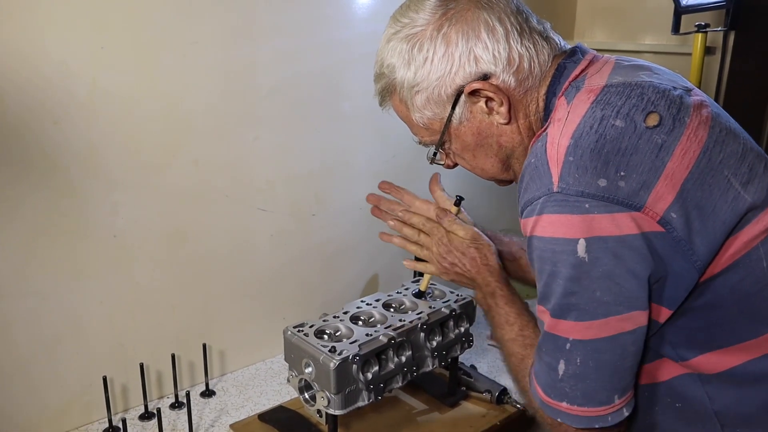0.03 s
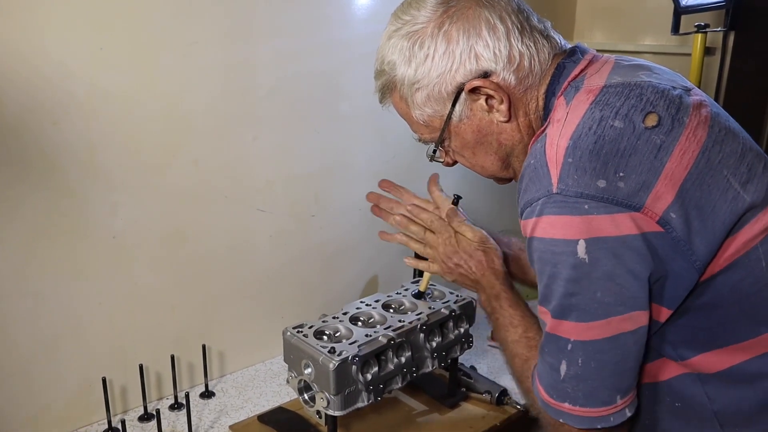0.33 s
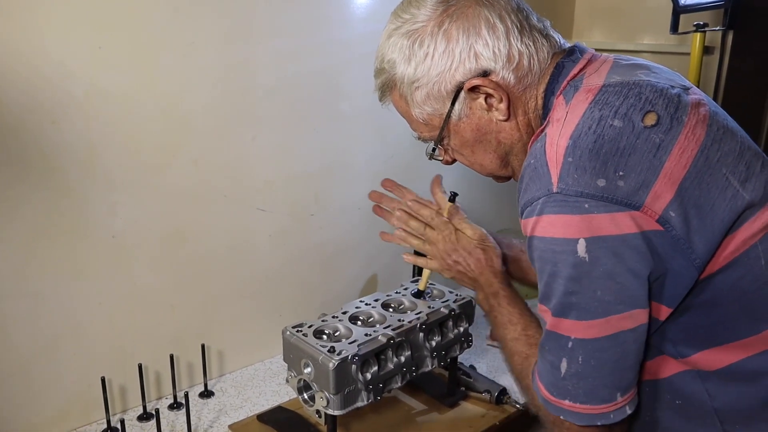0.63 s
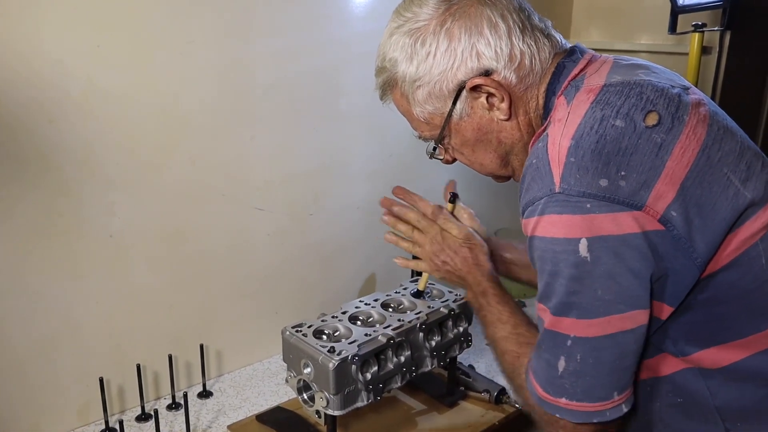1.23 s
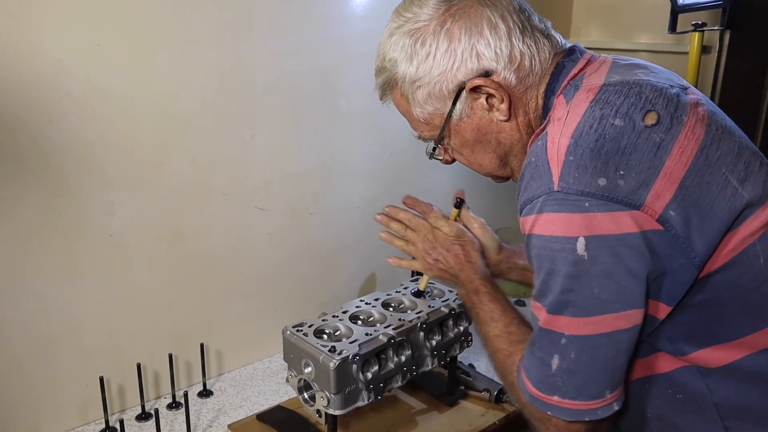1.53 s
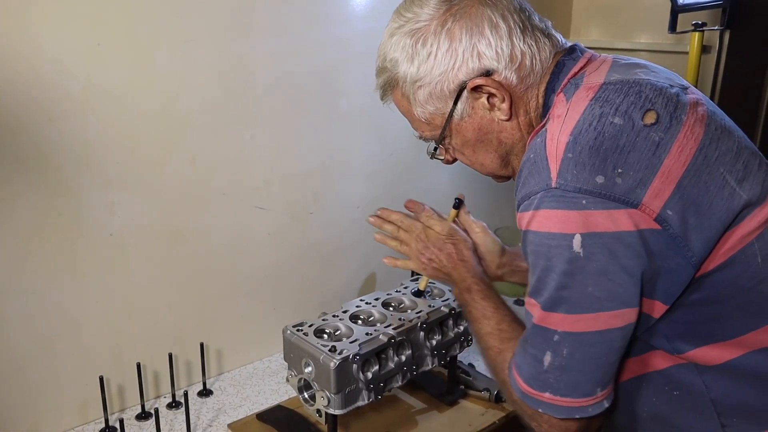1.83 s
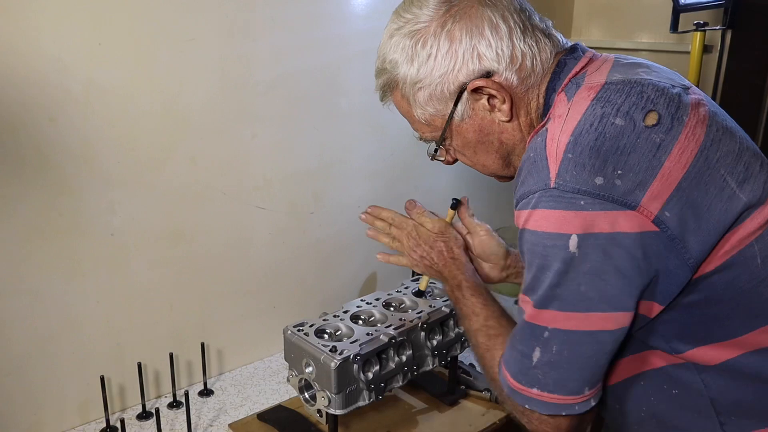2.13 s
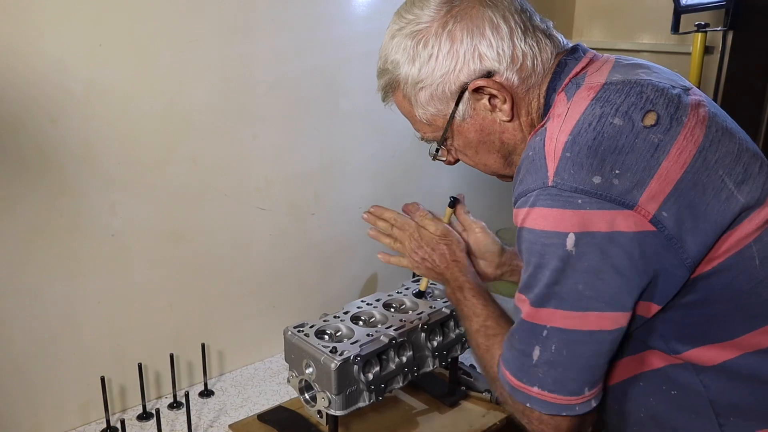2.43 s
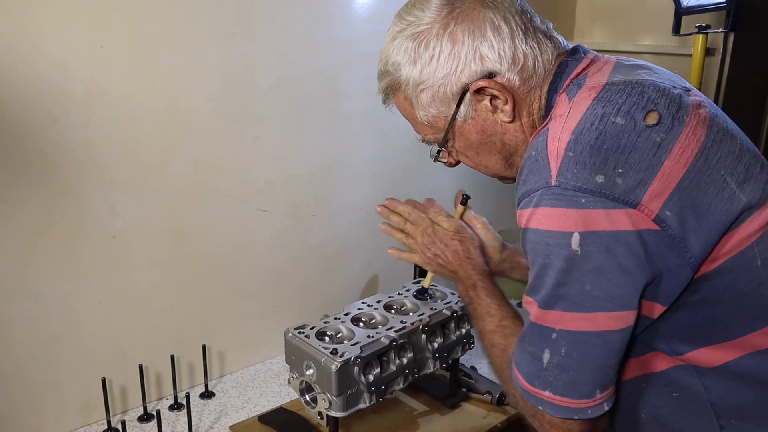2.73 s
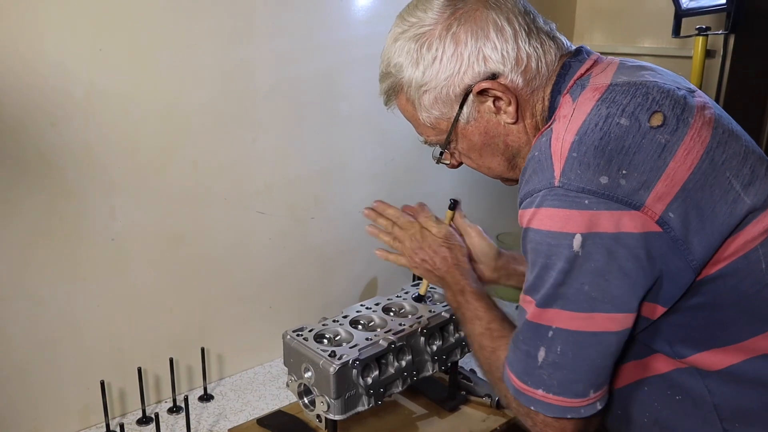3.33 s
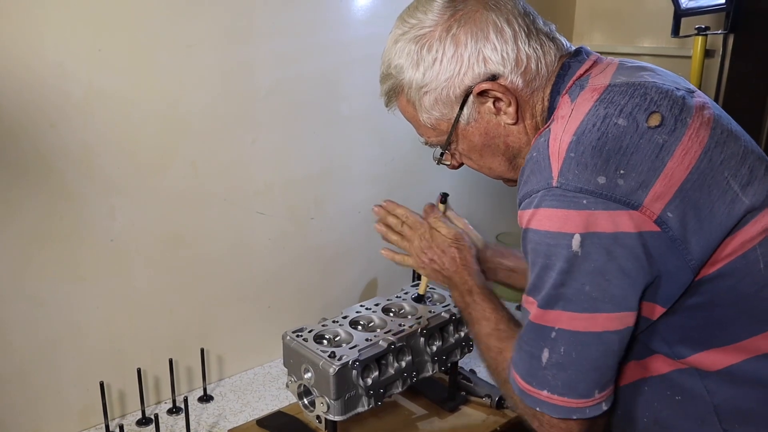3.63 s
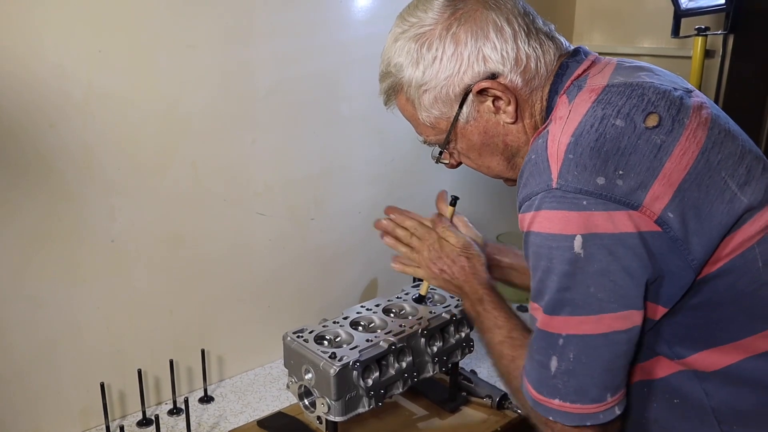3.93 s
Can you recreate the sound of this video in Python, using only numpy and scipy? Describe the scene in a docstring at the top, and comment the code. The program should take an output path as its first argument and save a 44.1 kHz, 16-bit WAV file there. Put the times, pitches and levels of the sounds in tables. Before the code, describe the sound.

Close up in a small workshop, gritty metallic grinding pulses rapidly as a valve is twisted back and forth in a cylinder head. It pauses briefly, the valve knocks back down, and the ringing scrape continues over a faint rumble.

```python
"""A valve rings as it is lapped in a cylinder head, twisted to and fro about seven times a second by a
stick rolled between the palms. Grains of abrasive paste break on the seat: their impacts make a broad
crunch and excite the modes of valve and casting, and stick-slip friction makes single modes squeal.
The valve is lifted and rings on freely, then lands with a knock that shakes the bench, and the lapping
resumes. A small workshop reflects crunch and knock, and rumbles and hums faintly."""
import sys
import numpy as np
from scipy import signal
from scipy.fft import rfft, irfft
from scipy.io import wavfile
from scipy.ndimage import uniform_filter1d

SR = 44100
rng = np.random.default_rng(int(sys.argv[2]) if len(sys.argv) > 2 else 0)


def master(y):
    """Save y as 16-bit WAV."""
    cut = np.clip(np.atleast_2d(y).T, -1, 1)
    pcm = np.round(cut * 32767)  # scale
    wavfile.write(sys.argv[1], SR, pcm.astype(np.int16))


N = 176400
T = np.arange(N) / SR

# Modes of valve and casting. Each row: frequency in Hz, level in dB before the drive is added,
# left-minus-right level in dB, phase lead of the left channel in radians.
METAL_MODES = [(1179, -41.3, -2, 0.8), (1229, -37.7, 6, 0.2), (1294, -36.8, 4, 0.1), (1593, -38, 1, -0.5),
               (1782, -39.1, -5, -2.6), (2671, -33.6, -3, 0.3), (2785, -42.6, 3, 2.8), (2890, -42, 0, 2),
               (3339, -35.3, 1, 2.4), (3506, -33.3, -5, 0.1), (3591, -33.0, 3, -0.1), (3750, -41, 0, 2),
               (3840, -41, 0, 2), (4067, -33.2, 2, 2.9), (4151, -36.2, -5, 1.6), (4205, -36.8, 2, 3.0),
               (4453, -38.4, 0, 1.9), (5152, -31, -2, 0.9), (5319, -30.5, 5, 2.5), (5824, -41.5, 4, -2.5),
               (5954, -42, 2, 3.1), (6154, -35.6, 0, 2.5), (6306, -39.2, 3, -2.6), (6579, -34.6, 3, 1.1),
               (6737, -34.4, 2, -2.8), (6813, -36.8, -2, -2.4), (6881, -37.8, 7, 2.8),
               (7048, -35.2, 4, 2.1), (7471, -35.2, -1, 1.3), (7721, -36.6, -6, -1.4),
               (8020, -32.8, 0, 2.6), (8287, -28.4, 1, 2.0), (8515, -36.3, -6, 3.0), (8574, -34.2, 0, 1.6),
               (8801, -38.2, -1, 2.9), (8919, -33.8, -1, 2.4), (8992, -36.2, 0, 1.8), (10348, -39, 1, 2.6),
               (10939, -35.7, -2, 2.7), (11514, -33.5, 2, -2.5), (11888, -32.8, 0, -3.1),
               (12394, -41, 1, 3.1)]
# How hard the grains drive the modes. Each row: frequency in Hz, gain in dB.
MODE_DRIVE = [(1250, 0), (12000, 0.6)]
# Modal decay; the valve's own pair near 3.5 kHz lasts longest.
# Each row: frequency in Hz, 60 dB decay time in seconds before DECAY_STRETCH.
MODE_DECAY = [(1250, .14), (3340, .27), (3500, .7), (3600, .76), (3750, .18), (5150, .26), (6900, .27),
              (8300, .19), (10300, .1)]
# Twists of the stick. Each row: start in seconds, peak moment as a share of the twist before PEAK_LEAD,
# relative levels of rasp, ring and hiss in dB.
TWISTS = [(-0.04, 0.36, 2.5, 0.8, -3), (0.108, 0.35, 1.0, 0.5, 0.1), (0.251, 0.55, 3, -1, 0.3),
          (0.395, 0.45, -0.2, -1, 0.8), (0.533, 0.57, 0, -1, 0), (0.68, 0.5, 1.2, 0.2, 0.3),
          (0.825, 0.44, -2, -0.7, -0.7), (0.968, 0.45, -0.3, -0.4, 1.2), (1.113, 0.47, -0.6, -3, 0.3),
          (1.246, 0.45, -2, -2, 2.5), (1.391, 0.44, 2, -0.4, 1.2), (1.521, 0.45, -2.5, -0.5, 0.9),
          (1.663, 0.48, -6, -1.5, -1.1), (1.8, 0.31, 3.1, 1, 0.8), (1.958, 0.39, -3.5, 0.5, -2),
          (2.09, 0.3, -3.5, -2, 0), (2.235, 0.22, 0.7, -0.3, 0), (2.365, 0.35, -2.5, -2.5, -0.8),
          (2.491, 0.65, 3.5, 0.5, 0.2), (2.622, 0.4, 3.5, 1, 1.2), (2.924, 0.34, 5, 1.9, -1),
          (3.075, 0.42, 2, -0.5, -2.2), (3.22, 0.45, 1.5, -1, -1.8), (3.376, 0.5, -1.2, -0.5, -4),
          (3.506, 0.3, 1.9, 0.5, 0.7), (3.653, 0.45, -1, -1.3, -2.5), (3.8, 0.3, -1.6, -0.4, 2.2),
          (3.933, 0.35, -2.5, -1, 0)]
# Rasp, ring and hiss. Each row: centre in Hz, share of the strength left as the stick reverses.
GRINDING_REGISTERS = [(1500, 0.91), (4000, 0.45), (8000, 0.02)]
# Grips of the seat. Each row: peak time in seconds, frequency in Hz near the mode, rms level in dB.
GRIPS = [(.32, 2670, -30), (.96, 2670, -28), (1.495, 2670, -25), (3.195, 2670, -28), (3.52, 2670, -29),
         (.31, 3506, -30), (1.48, 3506, -31), (1.97, 3590, -30), (3.6, 3590, -30), (3.7, 3506, -30),
         (.75, 5150, -26.5), (1.08, 5150, -27), (1.885, 5150, -23), (2.57, 5150, -23), (2.7, 5150, -23),
         (3.295, 5150, -24), (3.575, 5150, -24), (1.35, 5320, -25), (3.45, 5320, -27), (.76, 8285, -22),
         (1.61, 8285, -22)]
# Spectrum of the paste. Each row: frequency in Hz, relative spectral density in dB.
CRUNCH_SPECTRUM = [(300, -82), (750, -79.5), (1000, -71), (1200, -60), (1450, -70), (1800, -61),
                   (2200, -67.5), (2750, -64.5), (3150, -68.5), (3800, -58.5), (4750, -99), (5700, -66.5),
                   (6700, -61.5), (9300, -63), (10800, -57.5), (11800, -57), (13000, -82), (14300, -101)]
# Blows of the settling valve. Each row: delay in seconds, relative level in dB.
LANDING_BLOWS = [(.001, -1), (.007, -2), (.022, -7)]
# Modes of the bench. Each row: frequency in Hz, response to a unit blow in dB, 60 dB decay in seconds.
BENCH_MODES = [(85, -26, 1), (132.3, -32.5, 0.58), (196, -41, 0.72), (294.7, -38.5, 0.36)]
# Spectrum of the landing clatter. Each row: frequency in Hz, relative spectral density in dB.
CLATTER_SPECTRUM = [(45, 6), (150, 6), (300, -6), (750, -12.5), (1200, 10.5), (13000, -19)]
# Rumble of the room. Each row: frequency in Hz, spectral density in dB.
RUMBLE_SPECTRUM = [(22, -76), (35, -66.5), (55, -66.5), (90, -67), (190, -77), (270, -76), (400, -90.5),
                   (900, -85), (14000, -110)]
# Resonances of the hum. Each row: frequency in Hz, bandwidth in Hz, relative level in dB.
HUM_RESONANCES = [(250.5, 31, -1.5), (464, 240, -6)]
# Swell of the hum. Each row: time in seconds, gain in dB.
HUM_SWELL = [(2.1, -59), (2.4, -49.5), (3.3, -50.5), (4, -64.5)]
# Stereo image of the noise bands. Each row: frequency in Hz, left-right correlation.
STEREO_CORRELATION = [(60, .998), (130, .96), (260, .68), (1250, .6), (1900, 0), (2700, .35), (4200, -.5),
                      (8000, -.8), (11500, -.83)]

LIFT_S, LETUP_S, SEAT_S = 2.721, 0.014, 2.930   # the valve lifts, loses contact and lands
SPEED_POWER, PEAK_LEAD = 0.97, 0.13   # a scrape is loudest this share of a twist before its listed moment
GRAINS_PER_S, GRAIN_SPREAD_DB = 14000, 2.5
CHATTER_HZ, CHATTER_DB = 132, 2.5
WANDER_HZ, WANDER_DB = 3.7, 2.4
DECAY_STRETCH = 1.155
CUTOFF_HZ = 14000
LN_1000 = np.log(1000)   # a 60 dB decay in nepers


def ringing_metal(strengths, chatter):
    """Modal superposition: each grain strikes every mode with its own force as the contact wanders."""
    breaks = rng.random(N) < GRAINS_PER_S / SR
    grains = breaks * from_db(GRAIN_SPREAD_DB * rng.exponential(1, N)) * chatter
    out = np.zeros((2, N))
    for hz, db, pan_db, lead in METAL_MODES:
        t60 = at_hz(MODE_DECAY, hz) * DECAY_STRETCH
        strength = strength_at(strengths, hz) * from_db(WANDER_DB * drift(WANDER_HZ))
        force = grains * rng.standard_normal(N) * strength
        struck = steady_ring(resonator(force, hz, t60), strength, t60)
        sung = squeal(hz, t60)
        # grain-driven ringing and squeals share the mode's power
        power = from_db(db + at_hz(MODE_DRIVE, hz)) ** 2
        struck_power = max(power - np.mean(np.abs(sung) ** 2), power / 10)
        tone = struck / struck.real.std() * np.sqrt(struck_power) + np.sqrt(2) * sung
        sides = np.array([[.5], [-.5]])
        ears = unit_rms(from_db(pan_db * sides)) * np.exp(1j * lead * sides)
        out += (ears * tone).real
    return out


def twisting_friction():
    """Abrasion grows with sliding speed and needs contact. Returns each register's strength over time."""
    start, moment, *levels = np.transpose(TWISTS)
    end = np.append(start[1:], start[-1] + np.median(np.diff(start)))
    length = np.where(start < LIFT_S, np.minimum(end, LIFT_S + LETUP_S), end) - start
    twist = np.clip(np.searchsorted(start, T) - 1, 0, len(start) - 1)
    progress = np.clip((T - start[twist]) / length[twist], 0, 1)
    peak = np.clip(moment[twist] - PEAK_LEAD, .1, .9)
    rise_fall = np.minimum(progress / peak, (1 - progress) / (1 - peak))
    abrasion = np.abs(np.sin(np.pi / 2 * rise_fall)) ** SPEED_POWER
    seated = np.maximum(np.clip(1 - (T - LIFT_S) / LETUP_S, 0, 1), T > SEAT_S)
    strengths = []
    for db, (_, rest) in zip(levels, GRINDING_REGISTERS):
        strength = from_db(db[twist]) * (rest + (1 - rest) * abrasion)
        strengths.append(unit_rms(seated * uniform_filter1d(strength, size=400)))
    return strengths


def steady_ring(tone, strength, t60, evenness=.55, window_s=.18):
    """Envelope shaping: a slow gain evens a mode's loudness so the ringing swells with the twists."""
    energy_kept = np.exp(-2 * LN_1000 / (t60 * SR))
    stored = signal.lfilter([1], [1, -energy_kept], strength ** 2)
    expected, actual = (np.abs(uniform_filter1d(energy / energy.mean(), int(window_s * SR))) + 1e-9
                        for energy in (stored, np.abs(tone) ** 2))
    return tone * (expected / actual) ** (evenness / 2)


def squeal(hz, t60, rise_s=0.034):
    """Self-excited oscillation: stick-slip locks on to one mode, which swells and then decays freely."""
    swell, pitches = np.zeros(N), np.array(METAL_MODES)[:, 0]
    for peak_s, near_hz, db in GRIPS:
        if pitches[np.argmin(abs(pitches - near_hz))] == hz:
            before, after = np.minimum(T - peak_s, 0), np.maximum(T - peak_s, 0)
            swell += from_db(db) * np.exp(-(before / rise_s) ** 2 - LN_1000 * after / t60)
    return swell * np.exp(2j * np.pi * (hz * T + rng.random()))


def paste_crunch(strengths, chatter, colour, gain_db=-0.84, flicker_db=3, flicker_hz=5.3):
    """Dense, quickly damped fractures merge into noise, whose bands follow the twists and flicker."""
    crunch = sum(band * strength_at(strengths, hz) * from_db(flicker_db * drift(flicker_hz))
                 for hz, band in noise_bands(CRUNCH_SPECTRUM, count=34, colour=colour))
    return from_db(gain_db) * chatter * crunch


def ringing_colour(above_hz=4000, contrast_db=20, flank_hz=34, crowd_hz=9350, spacing_hz=260):
    """Spectral colouring: narrow gain peaks at the mode pitches give the treble crunch a metallic ring."""
    hz = np.fft.rfftfreq(N, 1 / SR)
    crowd = np.arange(crowd_hz, CUTOFF_HZ, spacing_hz)   # further peaks crowd together at the top
    crowd = crowd + spacing_hz * (rng.random(len(crowd)) - .5) / 2
    pitches = np.append(np.array(METAL_MODES)[:, 0], crowd)
    detuning = np.min(np.abs(hz - pitches[:, None]), axis=0)
    gain = from_db(contrast_db * np.exp(-(detuning / flank_hz) ** 2 / 2) * (hz > above_hz))
    return gain / np.sqrt(uniform_filter1d(gain ** 2, size=N // 30))   # keeps the broad balance


def landing_knock(clatter_db=-20.5, clatter_t60_s=0.22):
    """Impulse excitation: each blow of the landing valve starts a clatter and a thud of the bench."""
    blows, energy = np.zeros(N), np.zeros(N)
    for delay, db in LANDING_BLOWS:
        at = int((SEAT_S + delay) * SR)
        blows[at] += from_db(db)
        energy[at:] += from_db(db) ** 2 * np.exp(-2 * LN_1000 * T[:N - at] / clatter_t60_s)
    thud = sum(from_db(db) * resonator(blows, hz, t60).imag for hz, db, t60 in BENCH_MODES)
    clatter = unit_rms(sum(band for _, band in noise_bands(CLATTER_SPECTRUM, count=10)))
    return thud + from_db(clatter_db) * np.sqrt(energy) * clatter


def workshop_reverb(direct, t60_s=0.27, level_db=-8.5, delay_s=0.0084):
    """Reverberation: diffuse reflections from the near walls add an exponentially decaying tail."""
    t = T[:SR // 2]
    tail = rng.standard_normal((2, len(t))) * np.exp(-LN_1000 * t / t60_s) * (t > delay_s)
    tail /= np.sqrt(np.sum(tail ** 2, axis=1, keepdims=True))
    return direct + from_db(level_db) * signal.fftconvolve(direct, tail, axes=1)[:, :N]


def room_tone():
    """Filtered noise: broad bands give a low rumble, narrower resonances a wavering hum."""
    hum = np.zeros(N)
    for hz, width_hz, db in HUM_RESONANCES:
        tone = resonator(rng.standard_normal(N), hz, t60=LN_1000 / (np.pi * width_hz))
        hum += from_db(db) * unit_rms(tone.real)
    rumble = sum(band for _, band in noise_bands(RUMBLE_SPECTRUM, count=14))
    return rumble + hum * from_db(np.interp(T, *np.transpose(HUM_SWELL)))


def resonator(force, hz, t60):
    """Damped harmonic oscillator: the complex response of one mode to a force."""
    pole = np.exp((-LN_1000 / max(t60, .005) + 2j * np.pi * hz) / SR)
    return signal.lfilter([1], [1, -pole], force + 1e-18)


def noise_bands(spectrum, count, colour=1):
    """Partial coherence: mid and side noise mix to a set correlation. Yields centre in Hz and band."""
    edges = np.geomspace(spectrum[0][0], min(spectrum[-1][0], SR * .45), count + 1)
    noise = irfft(rfft(rng.standard_normal((2, 2, N))) * colour, N) * np.sqrt(SR / 2)
    for k, (low, high) in enumerate(zip(edges, edges[1:])):
        bandpass = signal.butter(2, [low, high], "band", fs=SR, output="sos")
        mid, side = signal.sosfilt(bandpass, noise[k % 2])
        hz = np.sqrt(low * high)
        alike = at_hz(STEREO_CORRELATION, hz)
        stereo = np.sqrt((1 + alike) / 2) * mid + np.sqrt((1 - alike) / 2) * side * [[1], [-1]]
        yield hz, from_db(at_hz(spectrum, hz)) * stereo


def drift(hz, step=40):
    """Low-passed noise: a random fluctuation of unit rms, mostly slower than hz."""
    pole = np.exp(-2 * np.pi * hz * step / SR)
    noise = rng.standard_normal(N // step + 2002)
    slow = signal.lfilter([1], [1, -2 * pole, pole * pole], noise)[2000:]
    return np.interp(np.arange(N) / step, np.arange(len(slow)), unit_rms(slow))


def strength_at(strengths, hz):
    """Linear blend of the two nearest registers."""
    place = at_hz([(centre, k) for k, (centre, _) in enumerate(GRINDING_REGISTERS)], hz)
    return sum(strength * max(1 - abs(place - k), 0) for k, strength in enumerate(strengths))


def at_hz(table, hz):
    """Interpolation along a logarithmic frequency axis."""
    pitches, values = np.transpose(table)
    return np.interp(np.log(hz), np.log(pitches), values)


def from_db(db):
    return 10 ** (np.asarray(db) / 20)


def unit_rms(x):
    return x / np.sqrt(np.mean(x ** 2) + 1e-20)


def scene():
    """Superposition: metal and paste, driven by the same friction, add to the knock and the room."""
    strengths = twisting_friction()
    chatter = unit_rms(from_db(CHATTER_DB * drift(CHATTER_HZ)))
    metal = ringing_metal(strengths, chatter)
    crunch = paste_crunch(strengths, chatter, ringing_colour())
    return metal + workshop_reverb(crunch + landing_knock()) + room_tone()


def record(dry):
    """Soft saturation rounds the highest peaks, and a steep low-pass filter cuts the top."""
    rounded = dry / (1 + dry ** 8) ** (1 / 8)
    return signal.sosfilt(signal.ellip(10, .2, 90, CUTOFF_HZ, fs=SR, output="sos"), rounded)


dry = scene()
out = record(dry)
master(out)
```